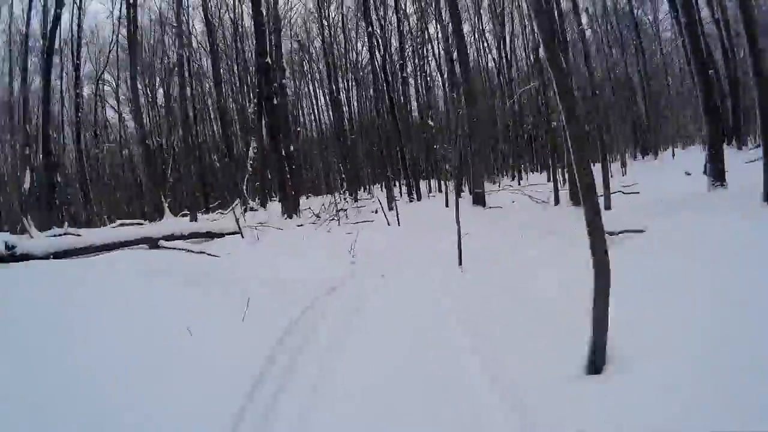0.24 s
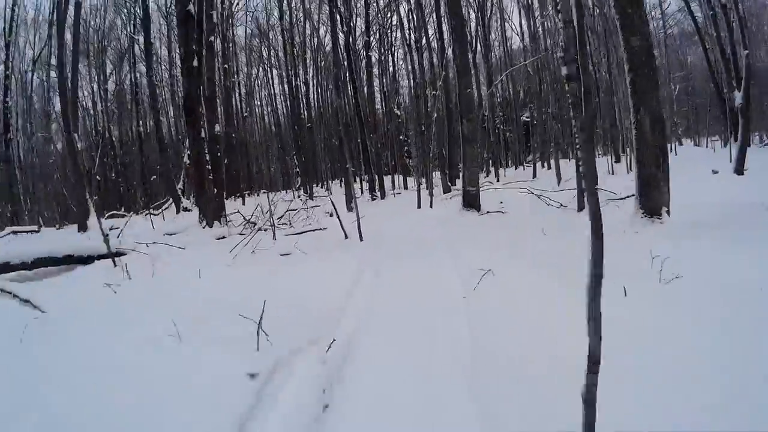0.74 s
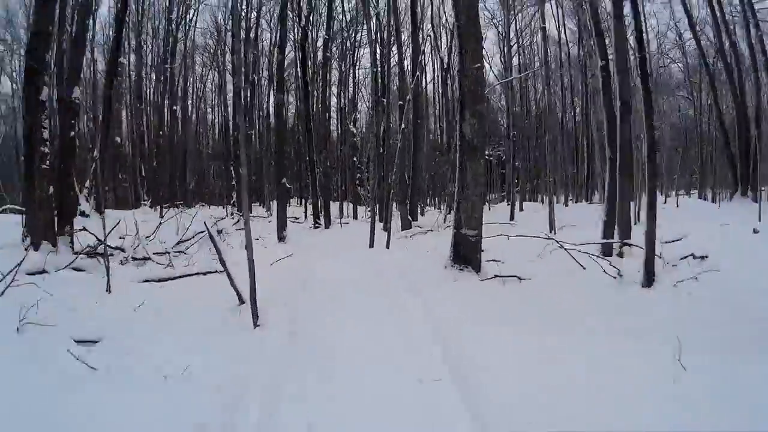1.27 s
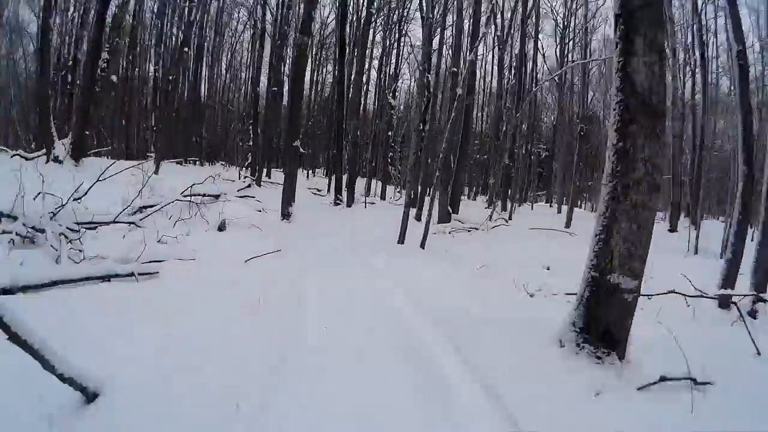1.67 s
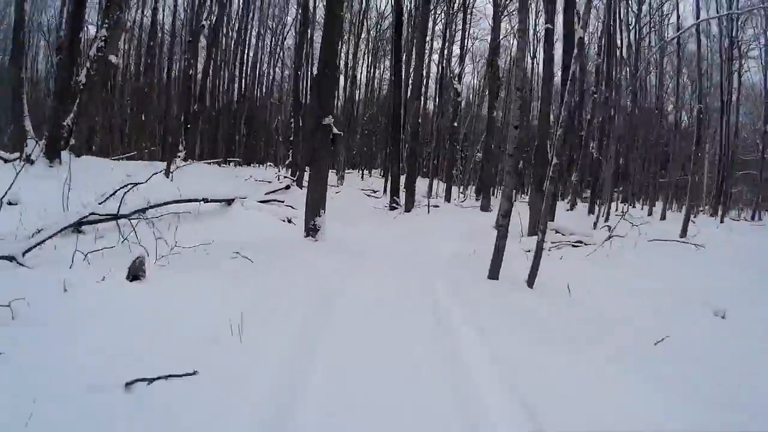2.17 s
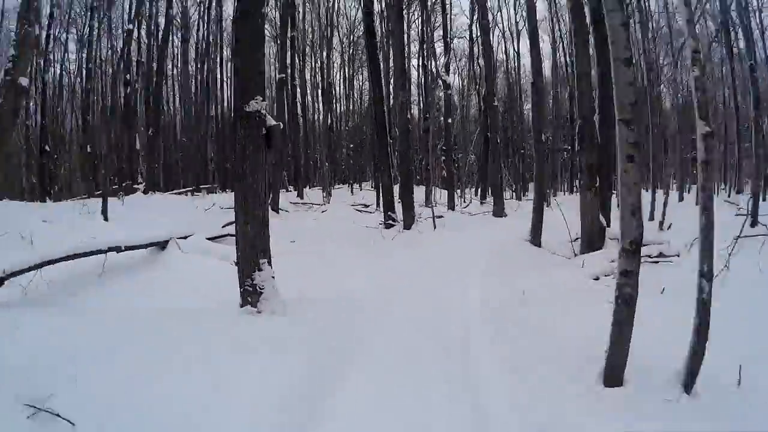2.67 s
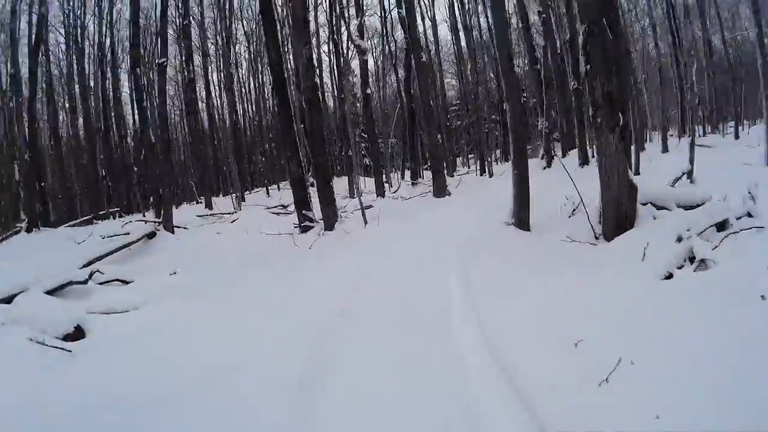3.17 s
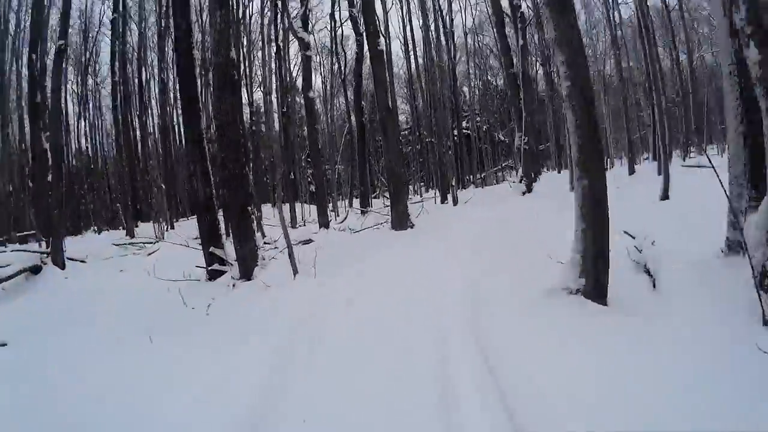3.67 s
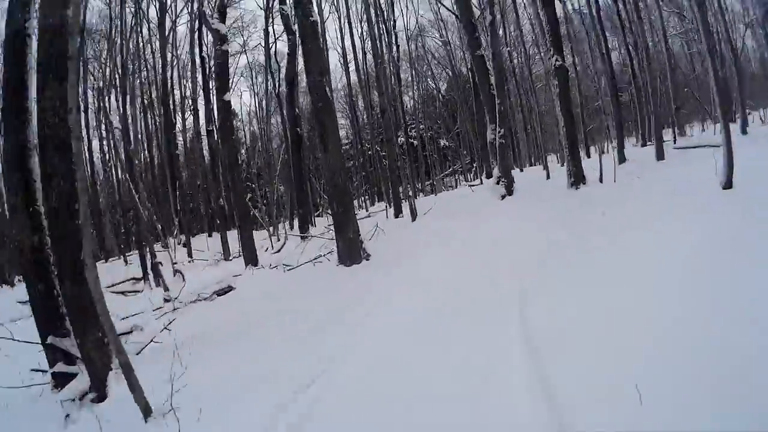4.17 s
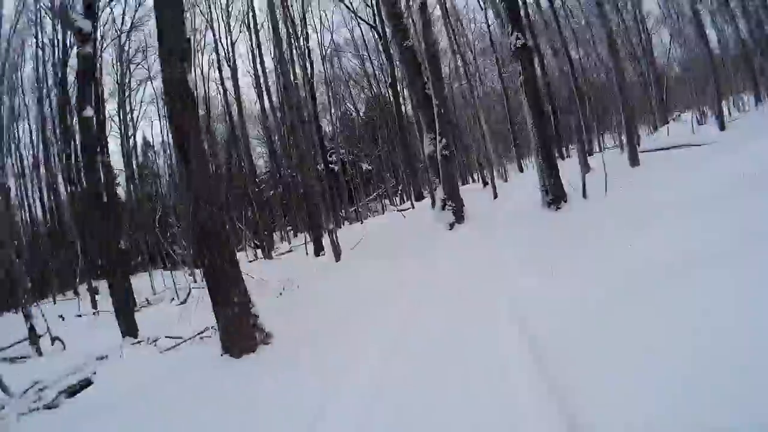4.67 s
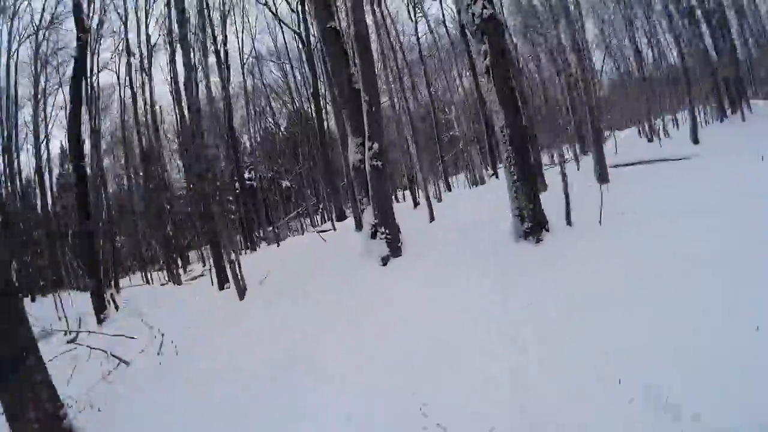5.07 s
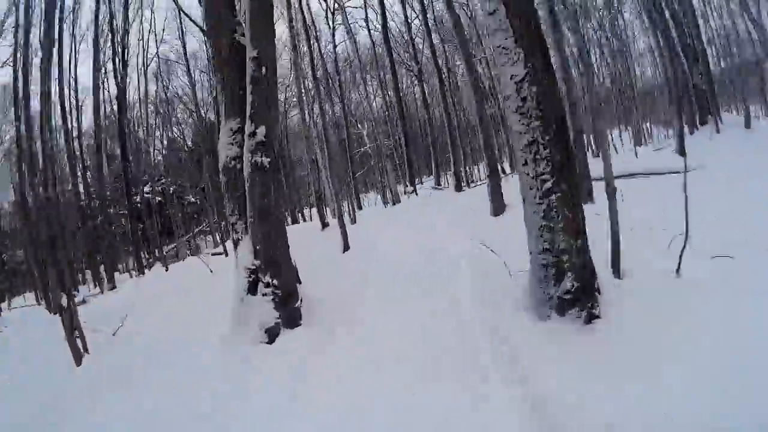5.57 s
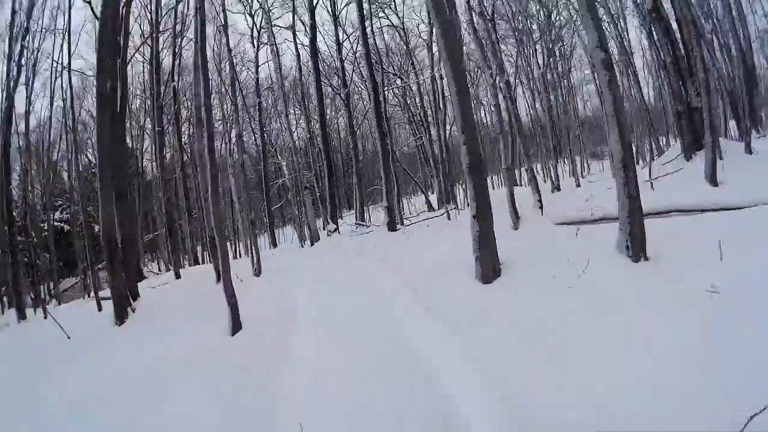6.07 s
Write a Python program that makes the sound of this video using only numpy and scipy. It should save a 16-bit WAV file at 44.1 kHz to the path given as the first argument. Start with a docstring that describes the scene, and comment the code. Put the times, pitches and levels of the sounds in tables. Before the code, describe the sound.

A mountain bike rolls along a snowy forest trail, heard close from a microphone fixed to it. The tyres make a low drone that swells over bumps while the freehub ticks in spurts. About two seconds in, snow crunches and a brake judders loudly with a faint squeak, then groans as it lets go. The brake disc keeps ringing softly, and in the last two seconds the slack chain jiggles and clacks.

```python
"""A mountain bike on packed snow, heard close up from a microphone fixed to it, mostly through the frame.
From the start the tyres shake the frame into a low drone; the chain clacks, the freehub ticks in spurts.
Near 2 s the snow crunches and a brake judders and squeaks for half a second, then groans as it lets go.
The pad drags on and keeps the rotor singing. From about 4.4 s the slack chain jiggles and clacks
against its guides."""
import sys
import numpy as np
from scipy import signal
from scipy.fft import rfft, irfft, next_fast_len
from scipy.io import wavfile
from scipy.ndimage import uniform_filter1d, minimum_filter1d

SR = 44100
rng = np.random.default_rng(int(sys.argv[2]) if len(sys.argv) > 2 else 0)


def pcm_store(signal):
    """Save signal as 16-bit PCM."""
    levels = np.round(np.clip(np.atleast_2d(signal), -1, 1) * 32767)
    wavfile.write(sys.argv[1], SR, levels.astype(np.int16).T)


N = 278712
TIME = np.arange(N) / SR

# Table levels are relative: each source applies its own gains on top.
# bumps, about one a wheel turn: crest t/s, length/s, drone level/dB, thud level/dB, fork level/dB
TRAIL_BUMPS = [(0.092, 0.62, -20.5, -37, -50), (0.45, 0.33, -19, -31, -33), (0.874, 0.093, -16.5, -32, -39),
               (1.315, 0.43, -20.5, -41, -42), (1.852, 0.45, -22, -36, -21.5),
               (2.037, 0.42, -15.5, -52, -28), (2.188, 0.2, -21, -45, -20.5), (2.556, 0.22, -26, -42, -36),
               (3.003, 0.069, -19.5, -50, -40), (3.232, 0.12, -25, -34, -27),
               (3.58, 0.15, -21.5, -44, -28.5), (3.842, 0.47, -33, -33, -39), (4.416, 0.15, -22, -55, -51),
               (4.637, 0.21, -40, -33, -27), (5.03, 0.41, -26, -33.5, -42.5),
               (5.286, 0.25, -35, -35.5, -33.5), (5.614, 0.45, -25.5, -35.5, -31.5),
               (5.894, 0.29, -23, -27, -26), (6.247, 0.15, -23, -46, -25.5)]
# how hard the brake bites: t/s, level/dB
BRAKE_BITE = [(1.825, -30), (1.839, -15.5), (2.003, -21.5), (2.051, -28), (2.097, -14.5), (2.109, -20.5),
              (2.349, -29.5), (2.39, -57)]
# the bike's high resonances: f/Hz, width/Hz, level/dB
SHELL_RESONANCES = [(2890, 140, -2.5), (3620, 72, -2.5), (3970, 160, -6), (4560, 200, -6), (5180, 66, 1),
                    (5220, 270, -4.5), (5970, 45, -3.5)]


def tyres():
    """Tread blocks pack the snow and shake the wheel, fork and frame, harder on every bump."""
    # resonances of wheel, fork and frame: f/Hz, width/Hz, level/dB
    wheel_modes = [(128.1, 3.73, 0)]
    fork_modes = [(193.7, 38.3, -3.5), (215.6, 48.4, -4), (258.8, 31.2, -10.5)]
    frame_modes = [(323, 2.9, -9), (444.4, 36.8, 1.5), (489.7, 40.4, 3), (524.6, 67, -6.5),
                   (664.5, 57, -10.5), (724.5, 79, -11.5), (808, 62, -10.5), (910, 59, -17)]
    # the frame's hollow rumble: t/s, level/dB
    rumble_levels = [(0.0, -33), (0.61, -38), (0.74, -30), (0.93, -38.5), (1.25, -29.5), (1.37, -36.5),
                     (1.81, -34), (1.83, -22), (2.15, -21.5), (2.55, -34), (3.48, -30.5), (4.49, -33.5),
                     (4.54, -25), (4.59, -34), (6.3, -33.5), (6.32, -42)]
    # spectrum of the ground thud: f/Hz, level/dB
    thud_spectrum = [(12, -22.5), (25, -19), (50, -16.5), (85, -11), (110, -4), (160, -19), (400, -71)]
    _, _, drone_db, thud_db, fork_db = np.transpose(TRAIL_BUMPS)
    drone = resonate(resonate(grains(3000, 3.2), wheel_modes), [(112, 79, 0)])
    fork = cut(resonate(grains(1500, 3.2), fork_modes), [150, 340], "band")
    rumble = cut(resonate(grains(1500, 3.58), frame_modes), [290, 950], "band", order=3)
    thud = cut(colour(rng.standard_normal(N), thud_spectrum), 270, "low")
    return (over_bumps(drone_db, even_db=-27) * steady(drone, seconds=0.06)
            + over_bumps(fork_db, even_db=-32) * steady(fork, seconds=0.4)
            + from_db(0.5) * gain_curve(rumble_levels) * steady(rumble, seconds=0.087)
            + from_db(3.5) * over_bumps(thud_db, even_db=-39) * steady(thud, seconds=0.17))


def over_bumps(crests_db, even_db):
    """Gain of a part that hums on even snow and gets a smooth swell of power from every bump."""
    power = from_db(even_db) ** 2
    for (s, length, *_), db in zip(TRAIL_BUMPS, crests_db):
        swell = np.cos(np.pi * np.clip((TIME - s) / length, -.5, .5))
        power = power + (from_db(db) * swell) ** 2
    return np.sqrt(power)


def judder():
    """The brake grabs and slips; each jolt rings fork and mount differently, with a faint gritty edge."""
    # single hard knocks as the brake grabs and later drags: t/s, level/dB
    knocks = [(1.714, -20.5), (1.755, -12.5), (1.832, -10.5), (1.904, -14.5), (1.942, 1), (1.968, -3),
              (1.994, -5.5), (2.063, -13.5), (2.326, -15), (2.572, -18), (2.887, -21), (2.973, -21.5),
              (3.155, -20.5), (3.192, -16.5), (3.228, -19)]
    # modes of fork and mount under a jolt: f/Hz, level/dB, t60/s
    knock_modes = [(243, -24, 0.11), (456, -4.5, 0.0092), (731, -11.5, 0.032), (939, -21, 0.068),
                   (1183, -9.5, 0.023), (1410, -11, 0.05), (1494, -9.5, 0.058), (1813, -22, 0.052)]
    rings, edges, t = np.zeros(N), np.zeros(N), TIME[:SR // 10]
    attack = 1 - np.exp(-t / 0.0012)
    blows = [*knocks, *jolts()]
    for (s, db), chance in zip(blows, rng.standard_normal((len(blows), len(knock_modes), 3))):
        for (hz, level, t60), (strength, lag, flex) in zip(knock_modes, chance):
            start = s + 1.2 * lag / hz   # the slip takes a moment, so the modes start out of step
            tone = ring(t, hz * (1 + 0.012 * flex), t60, wobble=0.0097)   # the flexing fork shifts pitch
            add(rings, start, from_db(db + level + 2 * strength) * attack * tone)
        add(edges, s, from_db(db - 60 * t / 0.037) * rng.standard_normal(len(t)))
    grit = cut(resonate(edges, SHELL_RESONANCES), 6500, "low", order=4)
    return from_db(7) * cut(rings, 2800, "low", order=8) + from_db(-16.5) * grit


def jolts(count=60, per_s=68, above_bite_db=8, scatter_db=2):
    """The brake sticks and slips at an uneven pace, as hard as it bites: rows of t/s, level/dB."""
    when, bite_db = np.transpose(BRAKE_BITE)
    s = when[0] + (np.arange(count) + rng.uniform(0, .7, count)) / per_s
    db = np.interp(s, when, bite_db) + above_bite_db + scatter_db * rng.standard_normal(count)
    return np.column_stack([s, db])[s < when[-1]]


def brake_pad():
    """The pad rasps on the rotor with a thin high squeak, then groans as it lets go."""
    # low groan of the release: t/s, f/Hz, level/dB
    groan_curve = [(2.33, 342, -53), (2.39, 332.4, -31), (2.46, 313, -41), (2.52, 319, -25),
                   (2.57, 329, -28.5), (2.63, 307, -64)]
    # spectrum of the rasp: f/Hz, level/dB
    rasp_spectrum = [(1200, -36), (2300, 13), (3300, 2), (5200, -9),
                     (6300, -11), (7200, -6), (9500, -6), (15000, -28.5)]
    bite = from_db(np.interp(TIME, *np.transpose(BRAKE_BITE), left=-np.inf, right=-np.inf))
    squeak_hz = np.interp(TIME, [2.0, 2.35], [11200, 10950]) * (1 + 0.011 * waver(440, N))
    squeak = np.sin(2 * np.pi * np.cumsum(squeak_hz) / SR) * from_db(4 * waver(50, N))
    rasp = steady(colour(grains(620, 5.1), rasp_spectrum), seconds=0.11)
    s, hz, db = np.transpose(groan_curve)
    groan_hz = np.interp(TIME, s, hz) * (1 + 0.024 * waver(40, N))
    groan_gain = from_db(np.interp(TIME, s, db, left=-np.inf, right=-np.inf))
    groan = groan_gain * np.sin(2 * np.pi * np.cumsum(groan_hz) / SR)
    return bite * (from_db(-43.5) * squeak + from_db(-31) * rasp) + groan


def chain_clacks():
    """A link lands in a burst of hard chatter; its two main tones and its knock depend on where it hits."""
    # links hitting the guides: t/s, ring level/dB, impact level/dB, main f/Hz, bright f/Hz
    clacks = [(0.0054, -15, -45, 1527, 4100), (2.854, -37, -61.5, 1560, 4300),
              (4.389, -35, -61, 1550, 4200), (4.5403, -22.5, -36, 1530, 3380),
              (4.553, -29.5, -49, 1535, 3960), (4.647, -35, -65, 1505, 4160),
              (4.778, -21, -44.5, 1517, 4410), (5.1315, -18.5, -47.5, 1630, 4360),
              (5.1867, -15, -39, 1636, 4370), (5.2101, -22, -45, 1560, 4440),
              (5.5204, -16.5, -46, 1680, 4730), (5.691, -18.5, -39, 1530, 4320),
              (5.7991, -20.5, -41.5, 1600, 4430), (5.854, -35, -71, 1470, 4370),
              (5.876, -21.5, -41.5, 1690, 4350), (5.972, -28.5, -48.5, 1576, 4360),
              (6.173, -22.5, -42, 1680, 4430), (6.2965, -25, -44, 1620, 4480)]
    # modes common to all clacks: f/Hz, level/dB, t60/s
    body_modes = [(1410, 8.5, 0.0067), (1885, -9, 0.055), (2974, -18.5, 0.041), (3400, -18, 0.013),
                  (5520, -20, 0.034), (5400, -39, 0.016), (8170, -21.5, 0.024), (9540, -23, 0.017),
                  (11500, -25.5, 0.019), (15200, -26, .01)]
    out, t = np.zeros(N), TIME[:SR // 12]
    attack = 1 - np.exp(-t / 0.0003)
    for s, ring_db, impact_db, main_hz, bright_hz in clacks:
        body = sum(from_db(ring_db + level + rng.normal(0, 2.25)) * ring(t, hz, t60, wobble=0.058)
                   for hz, level, t60 in body_modes)
        main = from_db(ring_db + 5) * cut(ring(t, main_hz, 0.048, wobble=0.078), [1250, 1950], "band")
        bright = from_db(impact_db + 18.5) * ring(t, bright_hz, 0.02, wobble=0.074)
        knock = from_db(impact_db + 20.5) * (ring(t, 502, 0.061) - ring(t, 745, 0.018))
        chatter = cut(rng.standard_normal(len(t)), [3000, 6000], "band", order=1)
        chatter *= from_db(impact_db - 60 * t / 0.047)
        add(out, s, (body + main + bright + knock + chatter) * attack)
    return out


def freehub(gap_s=0.008, scatter_db=3.5, edge_drop_db=3.5):
    """Pawls drop at a nearly even pace, each with a double snap and a fainter partner in between."""
    # spurts of freewheeling: first tick t/s, number of ticks, level/dB
    spurts = [(0.0205, 2, -27), (0.0463, 3, -23), (0.094, 3, -35), (0.171, 3, -34.5), (0.2204, 6, -30),
              (0.314, 9, -33), (0.426, 3, -35), (0.457, 4, -28), (0.5934, 1, -21), (0.624, 1, -27.5),
              (0.7938, 2, -24.5), (0.872, 3, -27.5), (1.2443, 1, -41), (1.3438, 4, -21), (1.417, 1, -24),
              (1.4741, 1, -15.5), (1.4939, 2, -16), (1.5237, 2, -21), (1.649, 1, -34), (1.7212, 1, -28),
              (1.7502, 3, -22), (1.85, 7, -21.5), (1.928, 4, -32), (1.972, 9, -23), (2.068, 5, -19.5),
              (2.52, 4, -40.5), (3.6864, 1, -34)]
    # spectrum of a pawl tick: f/Hz, level/dB
    tick_spectrum = [(700, -31.5), (1600, -1), (2400, -4.5), (3200, -5), (3800, 5), (5000, 1), (6300, 0),
                     (7300, -7.5), (9000, -13.5), (11500, -21), (15500, -28)]
    snaps = np.zeros(N)
    for start, ticks, spurt_db in spurts:
        for k, (delay, share, late, slip) in enumerate(rng.random((ticks, 4))):
            s = start + k * gap_s + .002 * (slip - .5)
            from_middle = (2 * k + 1) / ticks - 1
            db = spurt_db - edge_drop_db * from_middle ** 2 + scatter_db * rng.standard_normal()
            add(snaps, s, from_db([db]))
            add(snaps, s + .0003 + 0.00096 * delay, from_db([db]) * (2 * share - 1))
            add(snaps, s + gap_s * late, from_db([db - 7]))
        # a pawl only grazes as the spurt begins and ends
        add(snaps, start - gap_s, from_db([spurt_db - 17.5]))
        add(snaps, start + ticks * gap_s, from_db([spurt_db - 18]))
    t = TIME[:SR // 50]
    rattle = from_db(-26 - 60 * t / 0.014) * rng.standard_normal(len(t))   # the hub shell rings on
    rattle[0] = 1   # the snap itself
    return from_db(16.5) * colour(signal.fftconvolve(snaps, rattle)[:N], tick_spectrum)


def snow():
    """Crystals break under the tread; the mount passes their crunch up to 2 kHz and only a trace above."""
    # crunch of the snow: t/s, level/dB
    crunch_levels = [(0.0, -47), (0.6, -49.5), (1.78, -44), (1.99, -22.5), (2.04, -29.5), (2.18, -31.5),
                     (2.34, -42), (3.75, -40), (4.21, -37), (4.63, -43.5), (5.54, -44), (5.65, -39.5),
                     (6.07, -45), (6.32, -36.5)]
    # resonances of the microphone's mount: f/Hz, width/Hz, level/dB
    mount_modes = [(1146, 34, 2), (1312, 105, 1), (1278, 173, 3), (1470, 64, 5), (1595, 45, 0.5),
                   (1766, 195, -3.5), (1910, 23, -14.5)]
    breaks = grains(2500, 3.8)
    low = cut(resonate(breaks, mount_modes), 2500, "low", order=6)
    high = cut(resonate(breaks + grains(6000, 1.4), SHELL_RESONANCES), 6800, "low")
    crunch = steady(low, seconds=0.22) + from_db(-24.5) * steady(high, seconds=0.24)
    return from_db(-1) * gain_curve(crunch_levels) * crunch


def chain_jiggle(count=230):
    """Loose links brush the guides some thirty-five times a second."""
    # strength of a typical tap: t/s, level/dB
    tap_levels = [(4.25, -59), (4.45, -43.5), (5.0, -46.5), (5.75, -44), (6.32, -41)]
    # resonances under a light tap: f/Hz, width/Hz, level/dB
    tap_modes = [(1290, 400, -9.5), (1620, 160, 1), (1943, 100, 6), (3620, 250, -24), (4100, 350, -17.5),
                 (5400, 200, -31)]
    taps, touch = np.zeros(N), np.hanning(SR // 80)
    for slot, (lag, size) in enumerate(zip(rng.random(count), rng.standard_normal(count))):
        tap = from_db(4 * size) * rng.standard_normal(len(touch)) * touch
        add(taps, (slot + lag) / count * TIME[-1], tap)
    return from_db(13.5) * gain_curve(tap_levels) * cut(resonate(taps, tap_modes), 4600, "low", order=5)


def rotor(brushes_per_s=26, swing_db=1):
    """Quick uneven brushes keep one disc mode singing, with a soft scrape and a flickering high sheen."""
    # the rotor against the lightly dragging pad: t/s, level/dB
    drag_levels = [(1.8, -77), (2.15, -41), (2.42, -39), (2.95, -38.5), (3.25, -40), (3.5, -46.5),
                   (4.28, -37), (4.5, -68.5)]
    # higher disc modes: f/Hz, width/Hz, level/dB
    sheen_modes = [(5760, 87, -1), (6130, 40, -2), (8400, 600, -7), (11400, 500, -9.5)]
    cycles = np.cumsum(brushes_per_s * (1 + 0.22 * waver(22, N))) / SR
    brush = rms_one(from_db(swing_db * np.cos(2 * np.pi * cycles)))
    rub = grains(4700, 3.0)
    tone = steady(cut(resonate(rub, [(1500, 46, 0)]), [1350, 1750], "band"), seconds=0.054)
    scrape = steady(cut(resonate(grains(5000, 2.5), SHELL_RESONANCES), 6300, "low", order=4), seconds=.1)
    sheen = steady(cut(resonate(rub, sheen_modes), 5000, "high"), seconds=.1)
    flicker = rms_one(from_db(2.5 * waver(35, N)))
    singing = brush * tone + from_db(-30.5) * scrape + from_db(-35.5) * flicker * sheen
    return gain_curve(drag_levels) * singing


def rotor_chirps(length_s=0.029):
    """Now and then the dragging pad catches, and a high mode of the disc swells and fades."""
    # faint chirps: crest t/s, f/Hz, level/dB
    catches = [(3.77, 4020, -55), (3.845, 6000, -59), (3.987, 6050, -58), (4.07, 6280, -61),
               (4.113, 6300, -64), (4.192, 6270, -57)]
    out, t = np.zeros(N), TIME[:int(length_s * SR)]
    for s, hz, db in catches:
        add(out, s - length_s / 2, from_db(db) * np.hanning(len(t)) * ring(t, hz, np.inf, wobble=.012))
    return out


def from_db(db):
    return 10 ** (np.asarray(db) / 20)


def rms_one(x):
    return x / np.sqrt(np.mean(x ** 2) + 1e-20)


def gain_curve(rows):
    """Rows of t/s, level/dB as a gain at every sample."""
    return from_db(np.interp(TIME, *np.transpose(rows)))


def cut(x, hz, kind, order=2):
    """Butterworth filter."""
    return signal.sosfilt(signal.butter(order, hz, kind, fs=SR, output="sos"), x)


def resonate(x, modes):
    """Parallel resonances with alternating signs: rows of f/Hz, width/Hz, level/dB."""
    out = np.zeros(N)
    for k, (hz, width, db) in enumerate(modes):
        r = np.exp(-np.pi * width / SR)
        ringing = signal.lfilter([1, 0, -1], [1, -2 * r * np.cos(2 * np.pi * hz / SR), r * r], x)
        out += (-1) ** k * from_db(db) * (1 - r * r) / 2 * ringing
    return out


def steady(x, seconds):
    """Unit level over the given time; faster flutter stays."""
    size = max(int(seconds * SR), 8)
    return x / np.sqrt(uniform_filter1d(uniform_filter1d(x * x, size), size) + 1e-20)


def colour(x, spectrum):
    """Causal (minimum-phase) filter with the given spectrum: rows of f/Hz, level/dB."""
    size = 2 * next_fast_len(N // 2 + 4096)
    hz, db = np.transpose(spectrum)
    bins = np.maximum(np.arange(size // 2 + 1) * SR / size, 1)
    cepstrum = irfft(np.log(from_db(np.interp(np.log(bins), np.log(hz), db))))
    cepstrum[1:size // 2] *= 2
    cepstrum[size // 2 + 1:] = 0
    return irfft(rfft(x, size) * np.exp(rfft(cepstrum)))[:N]


def grains(per_s, spread_db):
    """Random tiny collapses of uneven size."""
    sizes = from_db(spread_db * np.minimum(rng.exponential(1, N), 4)) * rng.standard_normal(N)
    return sizes * (rng.random(N) < per_s / SR) + 1e-18


def waver(rate_hz, size):
    """Smooth random wander of unit spread."""
    return rms_one(cut(rng.standard_normal(size + 4000), rate_hz, "low"))[4000:]


def ring(t, hz, t60, wobble=0):
    """A struck mode; a contact that keeps rattling bends its pitch."""
    bend = np.cumsum(wobble * waver(470, len(t))) / SR
    return np.sin(2 * np.pi * hz * (t + bend)) * from_db(-60 * t / t60)


def add(out, s, sound):
    """Lay a sound in at time s."""
    at = int(np.clip(s * SR, 0, N - 1))
    out[at:at + len(sound)] += sound[:N - at]


def scene():
    """All parts reach the one microphone through the frame, over a faint even hiss."""
    hiss = from_db(-71) * rng.standard_normal(N)
    rolling = tyres() + snow() + freehub()
    braking = judder() + brake_pad() + rotor() + rotor_chirps()
    return (rolling + braking + chain_clacks() + chain_jiggle() + hiss)[None]


def record(dry):
    """Behind the microphone a limiter ducks the loudest jolts and recovers slowly; the top is cut steeply."""
    limit_db, release_db_per_s, cutoff_hz = -3, 150, 16000
    over_db = np.maximum(20 * np.log10(np.abs(dry[0]) + 1e-9) - limit_db, 0)
    held_db = np.maximum.accumulate(over_db + release_db_per_s * TIME) - release_db_per_s * TIME
    gain_db = uniform_filter1d(minimum_filter1d(-held_db, size=128), size=128)
    low_pass = signal.ellip(10, .1, 80, cutoff_hz, fs=SR, output="sos")
    return signal.sosfilt(low_pass, dry * from_db(gain_db))


dry = scene()
out = record(dry)
pcm_store(out)
```